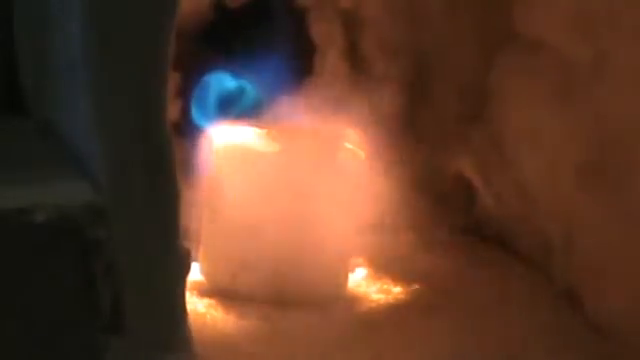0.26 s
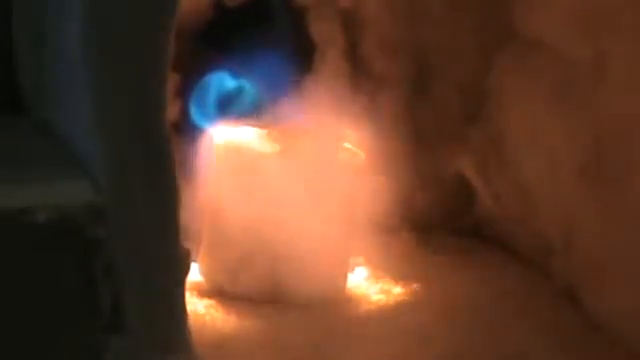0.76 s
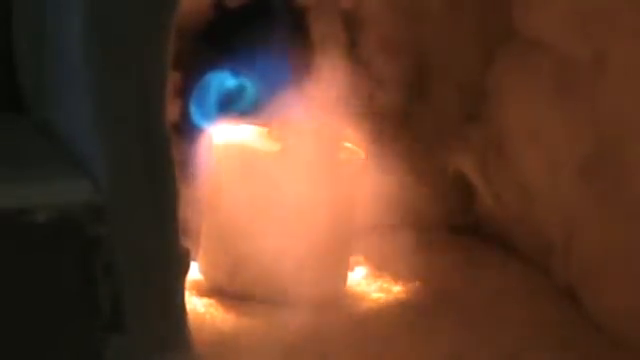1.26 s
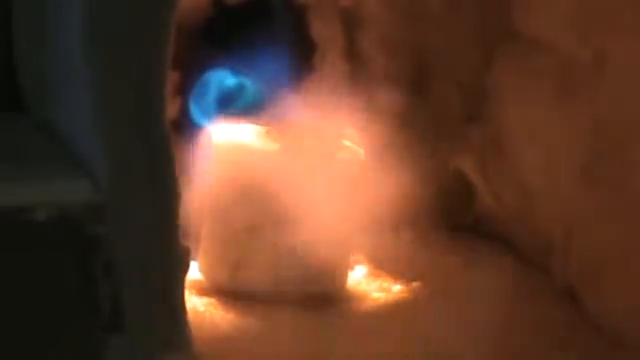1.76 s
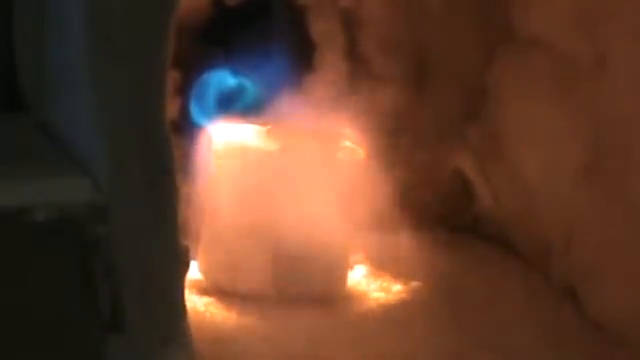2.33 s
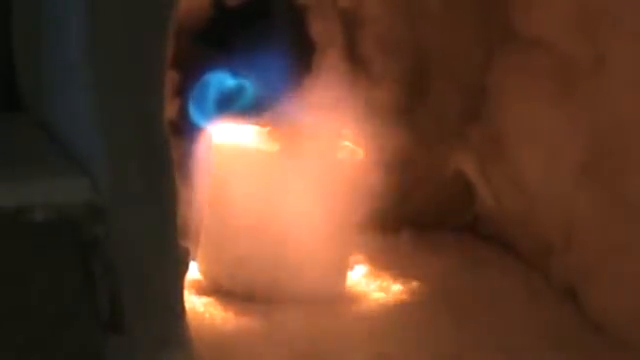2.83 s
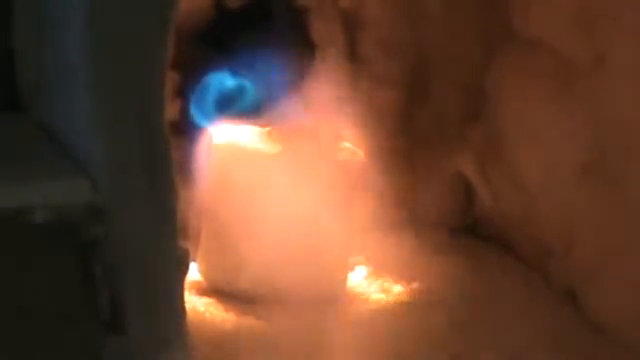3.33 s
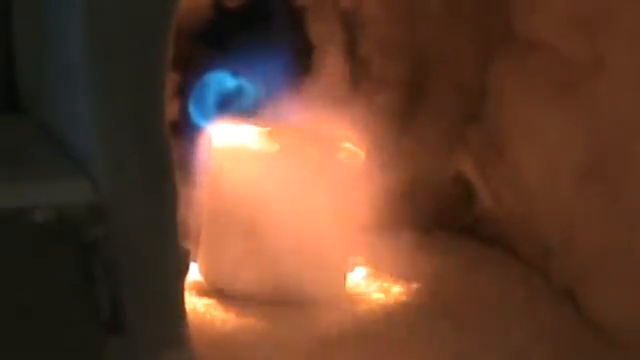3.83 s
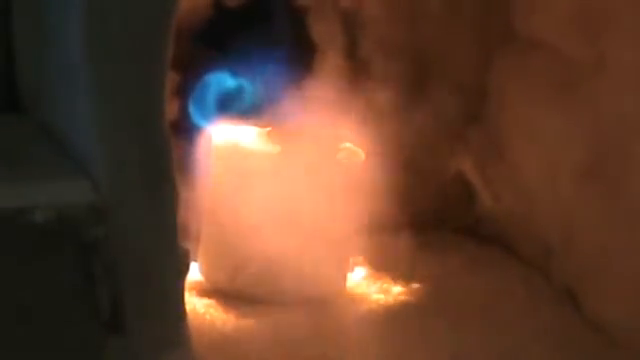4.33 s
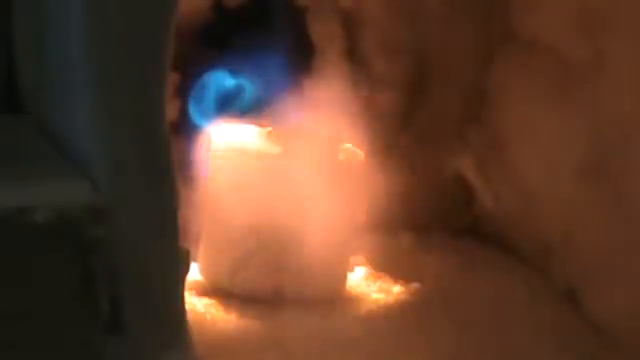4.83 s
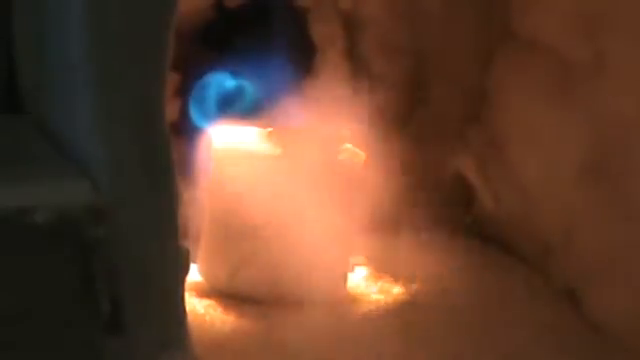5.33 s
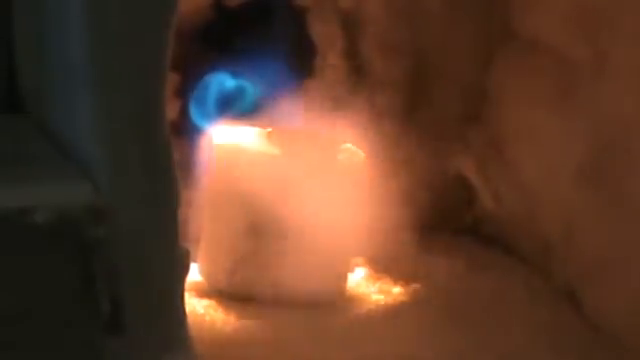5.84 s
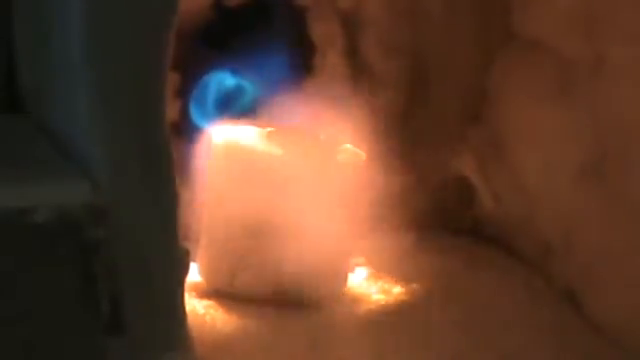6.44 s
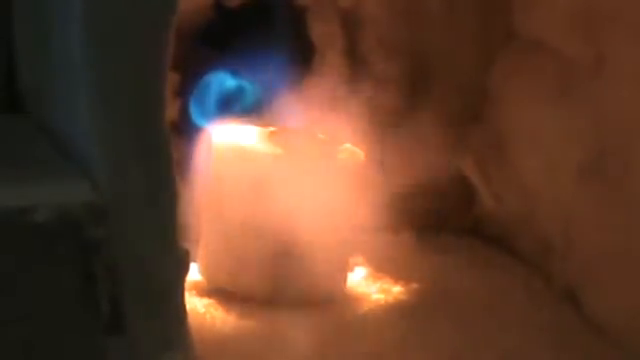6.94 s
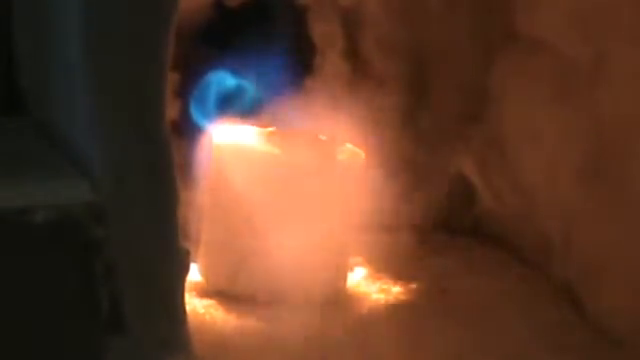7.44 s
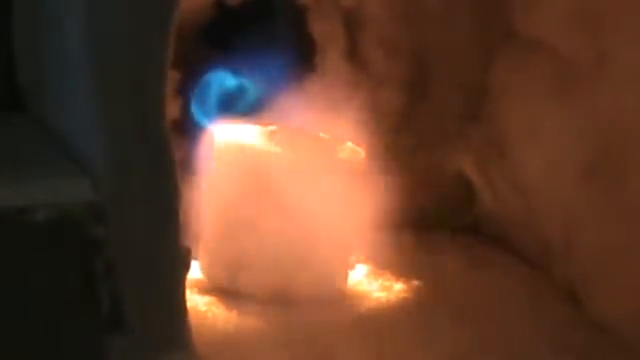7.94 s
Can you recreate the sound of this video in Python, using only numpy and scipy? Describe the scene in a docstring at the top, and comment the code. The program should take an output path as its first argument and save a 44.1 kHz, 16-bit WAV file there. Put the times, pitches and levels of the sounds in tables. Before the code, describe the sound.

Close to the microphone, a torch flame roars without a break inside a small brick furnace, with short echoes from the workshop walls. Above the resonant roar sits a soft, slightly ringing gas hiss, which sputters up briefly early on and again near the middle. The roar turns hollower just past the middle, and the low rumble of the draught slowly builds.

```python
"""A propane torch burns steadily into a small brick furnace, close by, for 8 s.
From the start the turbulent flame roars in the chamber's resonances, the gas jet hisses and rings
in the burner tube, and the workshop walls throw back short echoes.
The hiss swells briefly near 1.4 s, 3.6 s and, faintly, 5.2 s.
The roar is hollowest at 5.5 s; the draught's rumble grows towards the end."""
import sys
import numpy as np
from scipy import signal
from scipy.fft import rfft, irfft, next_fast_len
from scipy.io import wavfile
from scipy.ndimage import uniform_filter1d

SR = 44100
rng = np.random.default_rng(int(sys.argv[2]) if len(sys.argv) > 2 else 0)


def to_wav(sig):
    """Store sig (one row per channel, or 1-D mono) as 16-bit WAV at the path in sys.argv[1].

    Samples outside -1..1 are clipped; the rate is SR.
    """
    pcm = np.clip(np.atleast_2d(sig), -1, 1) * 32767
    pcm = np.round(pcm).astype(np.int16)
    wavfile.write(sys.argv[1], SR, pcm.T)  # frames by channels


N = 361179
SIZE = next_fast_len(N)
HZ = np.fft.rfftfreq(SIZE, 1 / SR)
TIME = np.arange(N) / SR


def gain_of(db):
    """dB to amplitude factor."""
    return 10 ** (np.asarray(db) / 20)


def follow(curve):
    """Rows of time_s, level_db to a gain per sample."""
    return gain_of(np.interp(TIME, *np.transpose(curve)))


def per_bin(points):
    """Rows of freq_hz, value interpolated over log frequency."""
    hz, value = np.transpose(points)
    return np.interp(np.log(HZ + 1), np.log(hz + 1), value)


def resonance_db(modes):
    """Sum of bell-shaped peaks and nulls."""
    return sum(db / (1 + (2 * (HZ - hz) / width_hz) ** 2) for hz, width_hz, db in modes)


def below(hz, order=24):
    """Steep low-pass response."""
    return 1 / (1 + (HZ / hz) ** order)


def wave(spectra):
    """Stereo spectra to waveforms."""
    return irfft(spectra, SIZE)[:, :N]


def unit_rms(stereo):
    """Scale to rms 1 in the mid channel."""
    return stereo / np.std(stereo.mean(0))


def wander(rate_hz):
    """Random drift of rms 1, mostly below rate_hz."""
    white = rfft(rng.standard_normal(SIZE))
    drift = irfft(white / (1 + (HZ / rate_hz) ** 2), SIZE)[:N]
    return (drift - drift.mean()) / drift.std()


def turbulence():
    """White-noise spectra, partly coherent between left and right."""
    # freq_hz, coherence (0-1)
    likeness = [(40, 0.7), (100, 0.6), (140, .99), (330, .92), (480, .96), (525, 0.35), (565, 1),
                (640, 0.8), (980, 0.9), (1200, 0.35), (1450, 0.85), (2800, 0.58), (9000, .81), (11500, .9),
                (13000, .97)]
    # freq_hz, left_lead_rad
    phase_lead = [(35, .2), (110, .85), (210, 1), (330, .5), (495, .45), (525, 1.4), (550, -.7),
                  (635, -.85), (690, .05), (790, -.2), (1050, .15), (2800, -.1), (3800, .15), (10000, 0)]
    # freq_hz, left_minus_right_db
    balance = [(90, -2), (220, 2), (490, 2.5), (535, 6), (630, -1.5), (790, -1), (880, 2), (1020, -2.5),
               (1270, -3), (1500, -2), (3200, -3), (5000, 0), (6800, 1.5), (11000, -0.5)]
    left, independent = rfft(rng.standard_normal((2, SIZE)))
    coherence = np.clip(per_bin(likeness), 0, 1)
    right = coherence * left + np.sqrt(1 - coherence ** 2) * independent
    right *= np.exp(-1j * per_bin(phase_lead))
    lean = gain_of(per_bin(balance) / 2)
    return np.array([left * lean, right / lean])


def walls(echo_db, decay_s, above_hz, count=60):
    """Stereo room response: short wall echoes comb the upper range."""
    taps = np.zeros((2, SIZE))
    for channel in taps:
        delay_s = rng.uniform(.003, .04, count)
        channel[(delay_s * SR).astype(int)] = rng.choice([-1, 1], count) * np.exp(-delay_s / decay_s)
    taps += taps[::-1] * 0.76  # closely spaced channels share each echo
    taps /= np.linalg.norm(taps, axis=1, keepdims=True)
    high_pass = HZ ** 2 / (HZ ** 2 + above_hz ** 2)
    return 1 + gain_of(echo_db) * rfft(taps) * high_pass


def hiss_swells(room, sputter_db=-0.7):
    """A duller hiss rises and sinks in sputtering spurts and longer flares."""
    # centre_s, length_s, level_db
    swells = [(1.39, .05, -41), (1.447, .035, -44), (3.517, .035, -41), (3.566, .035, -47),
              (3.598, .03, -45), (3.635, .3, -40), (3.707, .035, -45), (3.742, .03, -45), (5.18, .2, -50)]
    # freq_hz, density_db
    swell_spectrum = [(1200, -36), (2600, 9), (3500, 1.5), (5300, 0.5), (7000, 0.5), (10000, -9.5),
                      (12500, -18), (14000, -36)]
    envelope = sum(gain_of(db) * np.exp(-(2 * (TIME - centre_s) / length_s) ** 2)
                   for centre_s, length_s, db in swells)
    hiss = unit_rms(wave(turbulence() * room * gain_of(per_bin(swell_spectrum))))
    return hiss * envelope * gain_of(sputter_db * wander(rate_hz=70))


def gas_jet(room, trim_db=1.5, flutter_db=0.18, ring_hz=(7300, 7900), fizz_hz=10500, fizz_exponent=2.1):
    """Gas hisses from the nozzle and rings the burner tube; more flow, more fizz."""
    # freq_hz, density_db
    jet_spectrum = [(1500, -37), (2800, -1.5), (3300, -5), (4100, -8), (5300, -4.5), (6050, -8.5),
                    (6500, -8.5), (8000, -4.5), (10100, -6), (10600, -12), (11400, -10), (12000, -17),
                    (12700, -18), (13400, -29), (14500, -52)]
    # centre_hz, width_hz, lift_db
    tube_modes = [(2700,24,2), (2930,160,2.5), (3590,85,10), (4625,150,5), (6354,130,8.5), (6580,180,9.5),
                  (6760,110,6.5), (7119,106,4.5), (7440,70,7), (7520,70,6.5), (7670,210,6.5), (8550,80,6),
                  (9270,41,6), (10280,140,-0.5)]
    # time_s, level_db
    flow_curve = [(0.0, -41.5), (0.9, -41.9), (1.8, -41), (2.2, -40.5), (2.62, -39.5), (2.92, -40),
                  (3.17, -39.5), (3.35, -41.5), (3.55, -41), (3.9, -41), (4.8, -41.5), (5.45, -41.9),
                  (6.05, -41.5), (6.7, -41.3), (8.2, -42.5)]
    # time_s, gain_db of the ring band
    ring_curve = [(0.0, .5), (1.5, .5), (2.0, -1), (2.7, 1), (3.6, -.5), (4.9, -1.3), (6.1, 1), (7.4, 1.5),
                  (8.2, -1)]
    tube = turbulence() * room * gain_of(per_bin(jet_spectrum) + resonance_db(tube_modes))
    ring_band = below(ring_hz[1]) - below(ring_hz[0])
    fizz_band = 1 - below(fizz_hz)
    flow = follow(flow_curve)
    hiss = wave(tube * (1 - ring_band - fizz_band))
    ring = wave(tube * ring_band) * follow(ring_curve)
    fizz = wave(tube * fizz_band) * (flow / flow.mean()) ** (fizz_exponent - 1)
    return unit_rms(hiss + ring + fizz) * flow * gain_of(trim_db + flutter_db * wander(rate_hz=23))


def flame(room, body_db=-21.0, howl_db=-16.0, rasp_db=-24.5, flutter_db=0.5, gust_db=1.3):
    """Combustion noise rings the chamber; the rasp recedes as the hollow low howl swells."""
    # freq_hz, density_db
    roar_spectrum = [(15, -25), (60, -25.5), (120, -17.5), (138, -1), (210, -3.5), (440, 0.5), (600, -3.5),
                     (700, -5), (1050, -18.5), (1330, -17.5), (1520, -14.5), (2000, -18), (2500, -27),
                     (4200, -57.5), (12000, -78)]
    # centre_hz, width_hz, lift_db
    chamber_modes = [(75.5,14,9), (121,11,-3.5), (150,19,2), (203,12,-2.5), (238,57,4), (309.6,99,6),
                     (337.4,15.4,-6), (365.4,37,6), (374,15,-2), (419,31,6), (441.7,14,-3.5), (458,38,13),
                     (474,14,1.5), (493.3,20.6,10.5), (520,19,-0.5), (562.2,49.5,12), (600,40,8),
                     (620,13,-3), (672,34,7), (779,31,9.5), (829,30,-5.5), (857,21,4.5), (889.7,46,12),
                     (993,77,12.5), (1044,20,-3), (1077,101,10.5), (1148,25,5), (1206,30,7.5),
                     (1278,32,6.5), (1433.6,26.5,11), (1498,62,5), (1582,110,7.5), (1746,25,6),
                     (1824,22,2.5), (1900,17,7), (2125,56,3), (2305,58,5.5)]
    # crossover_hz between the seven bands
    splits_hz = 112, 400, 525, 650, 1020, 1300
    # time_s, gain_db
    body_curve = [(0.0, -1), (0.6, -1.5), (1.1, -1.5), (1.7, -1), (2.8, 1.2), (3.7, -1.2), (4.4, 0.7),
                  (5.1, -1.5), (6.05, 0.5), (7.2, -1), (7.75, -2.2), (8.2, -2)]
    # time_s, hollowness_db: how fully the flame sounds the chamber
    hollow_curve = [(0.0, -4), (0.8, -1), (2.0, -1), (3.1, 0), (3.7, 0), (4.6, -0.5), (5.5, 3.6),
                    (6.0, -1.5), (6.5, 0.5), (7.3, -1), (8.2, 1)]
    # time_s, gain_db
    high_howl_curve = [(0.0, -2), (0.7, -1.5), (1.35, -2.5), (2.08, 3), (2.5, 1), (2.93, 3.8), (3.58, 0),
                       (4.25, 1.5), (4.65, 3.5), (5.1, -3.5), (5.55, 0), (6.35, -1.2), (7.1, 1),
                       (7.9, -4.5)]
    # time_s, gain_db
    overtone_curve = [(0.0, 0), (0.48, 3.3), (0.7, -1), (1.1, -2), (1.45, 1.5), (2.5, 0.5), (3.35, -3),
                      (3.8, 0.5), (5.6, 0.8), (6.8, -2), (8.2, -1)]
    # time_s, gain_db of the rasp's upper edge
    edge_curve = [(0.0, 0), (0.4, -1.5), (0.8, 1.5), (1.3, 1), (2.0, -1), (2.6, 0.9), (3.2, -0.8),
                  (4.2, 0.5), (5.5, -1), (6.1, 0.4), (7.6, -0.5), (7.75, 1.8), (8.2, -1)]
    draught_start_db, draught_db_per_s = -2.5, .5
    chamber = turbulence() * room * gain_of(per_bin(roar_spectrum) + resonance_db(chamber_modes))
    bands = np.diff([below(hz) for hz in splits_hz], axis=0, prepend=0, append=1)
    rumble, body, low_howl, high_howl, rasp, overtones, edge = (wave(chamber * band) for band in bands)
    hollow = follow(hollow_curve)
    draught = gain_of(draught_start_db + draught_db_per_s * TIME + gust_db * wander(rate_hz=2))
    body = unit_rms(body * follow(body_curve) + rumble * draught)
    howl = unit_rms(low_howl * hollow ** 0.53 + high_howl * follow(high_howl_curve))
    rasp = (rasp + overtones * follow(overtone_curve)) * hollow ** -0.35
    rasp = unit_rms(rasp + edge * follow(edge_curve))
    flutter = gain_of(flutter_db * wander(rate_hz=17))  # flame licks the metal
    return body * gain_of(body_db) + howl * gain_of(howl_db) + rasp * flutter * gain_of(rasp_db)


def scene():
    """Flame, jet and swells in one workshop."""
    room = walls(echo_db=-6.0, decay_s=0.024, above_hz=1380)
    return flame(room) + gas_jet(room) + hiss_swells(room)


def record(dry, threshold_db=-6, squeeze=0.53, recovery_db_per_s=70, cutoff_hz=14250):
    """Fast limiter ducks the mix on the roar's peaks, then a low-pass."""
    peak_db = 20 * np.log10(abs(dry).max(0) + 1e-9)
    over_db = np.maximum(peak_db - threshold_db, 0)
    fall_db = TIME * recovery_db_per_s
    held_db = np.maximum.accumulate(over_db + fall_db) - fall_db
    ducked = dry / gain_of(squeeze * uniform_filter1d(held_db, size=60))
    low_pass = signal.firwin(511, cutoff_hz, window=("kaiser", 9), fs=SR)
    return signal.oaconvolve(ducked, low_pass[None], "same")


dry = scene()
out = record(dry)
to_wav(out)
```